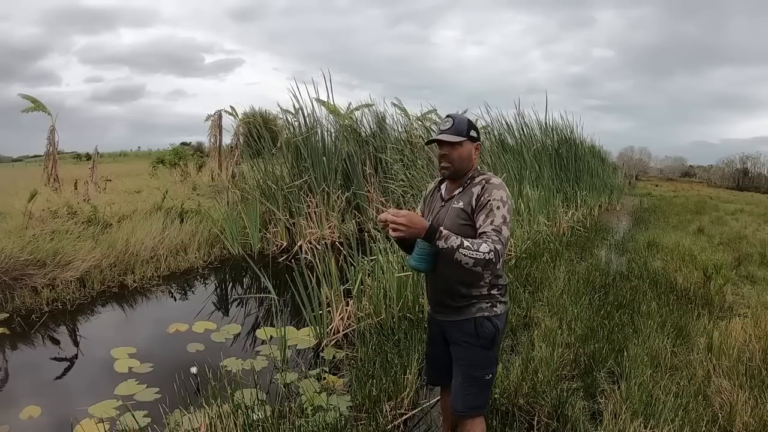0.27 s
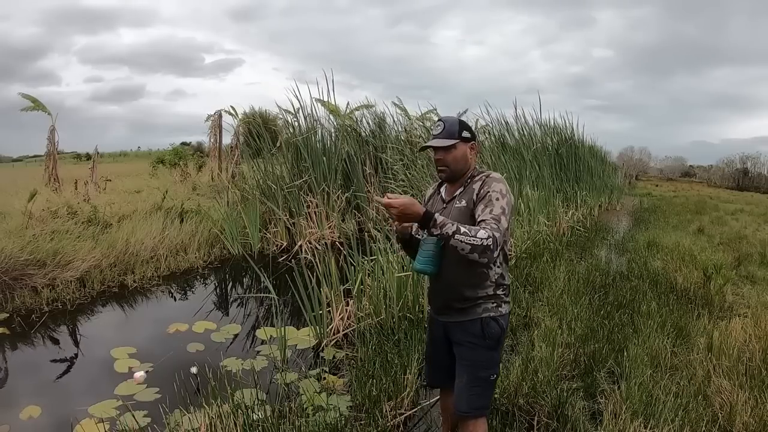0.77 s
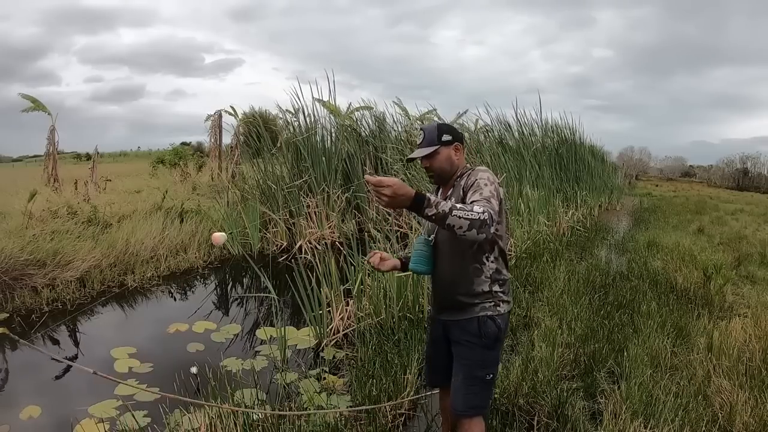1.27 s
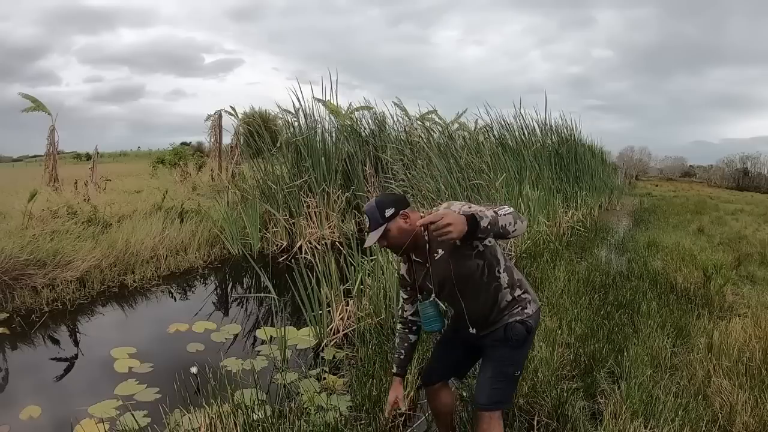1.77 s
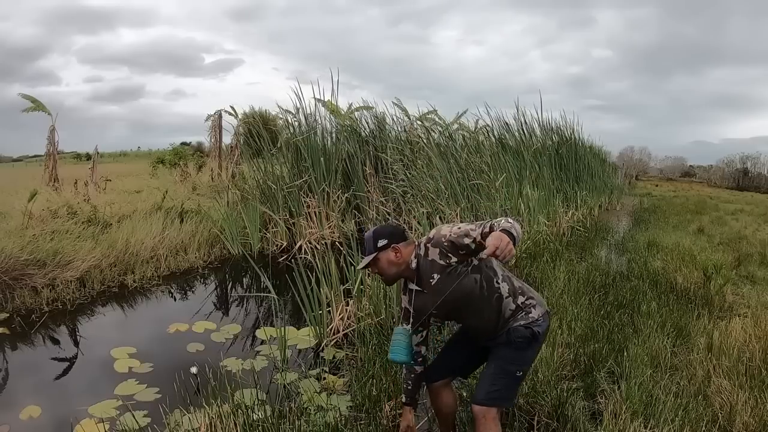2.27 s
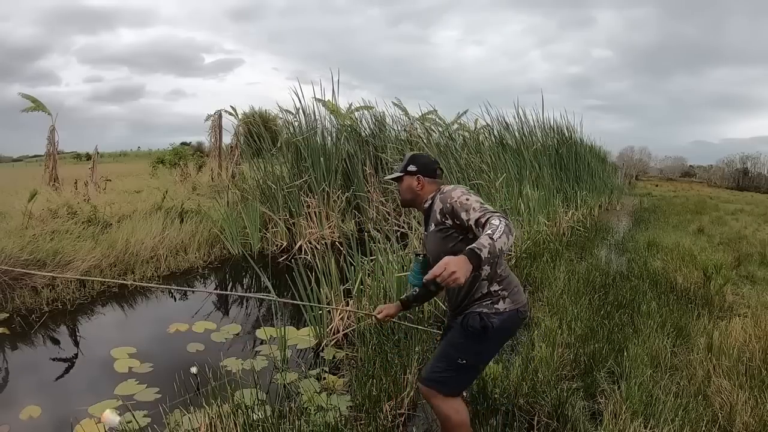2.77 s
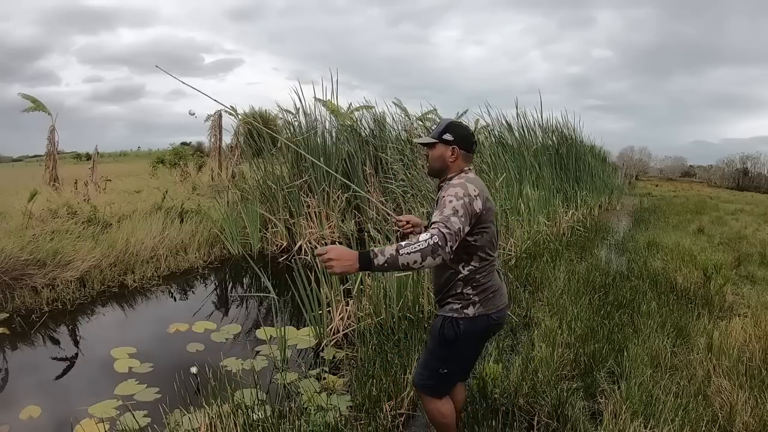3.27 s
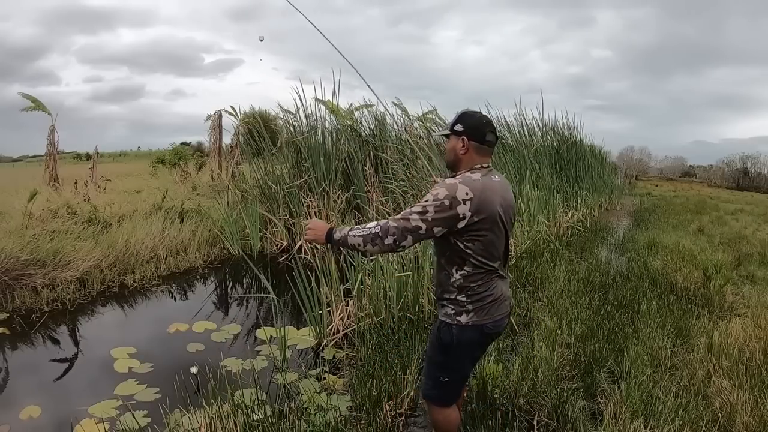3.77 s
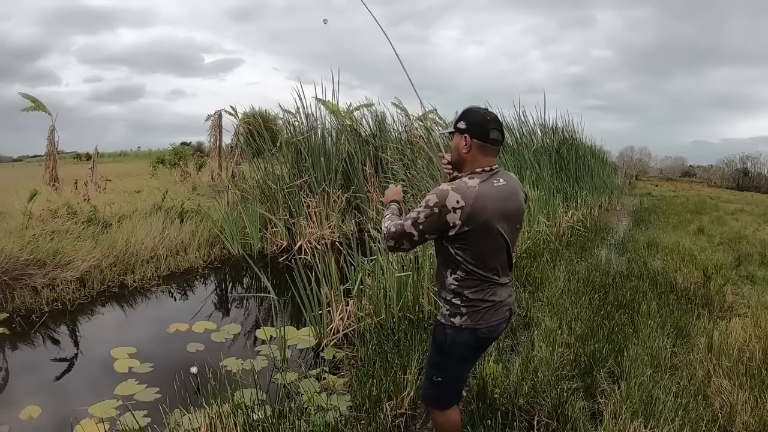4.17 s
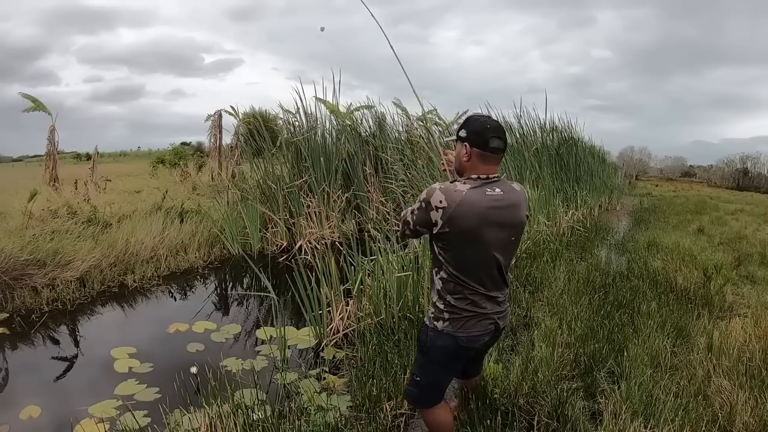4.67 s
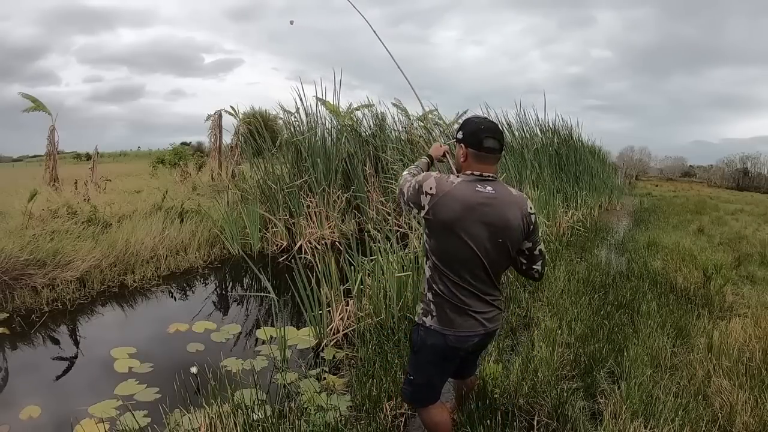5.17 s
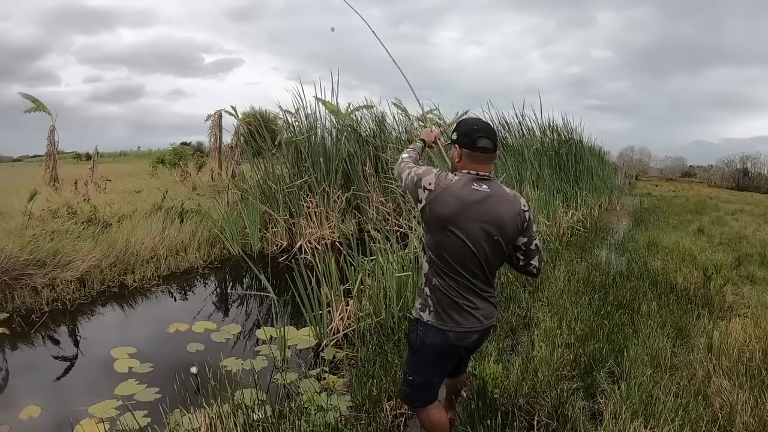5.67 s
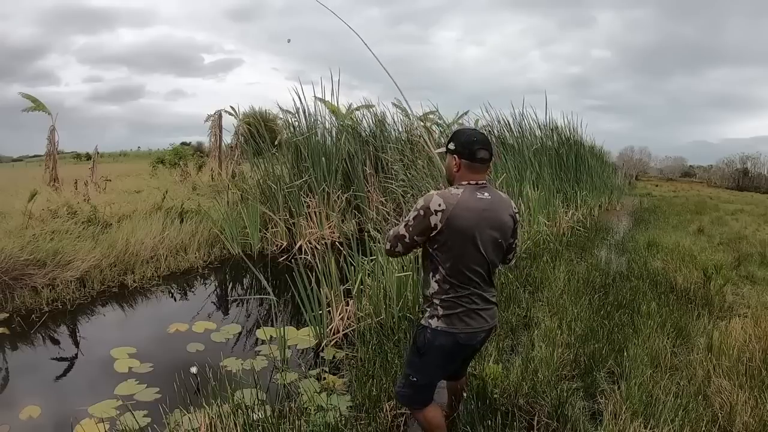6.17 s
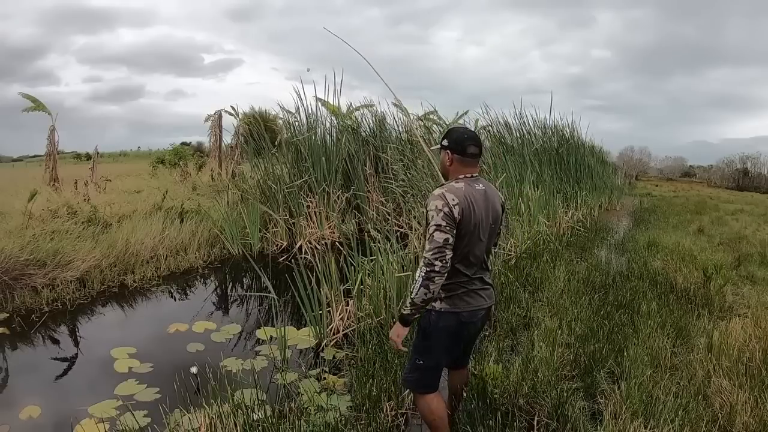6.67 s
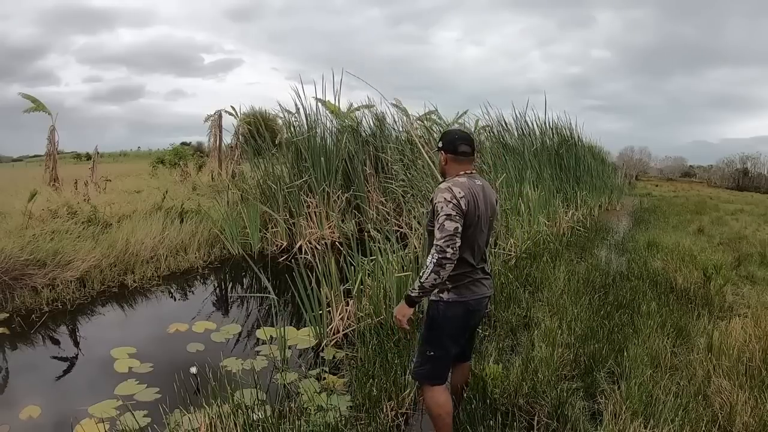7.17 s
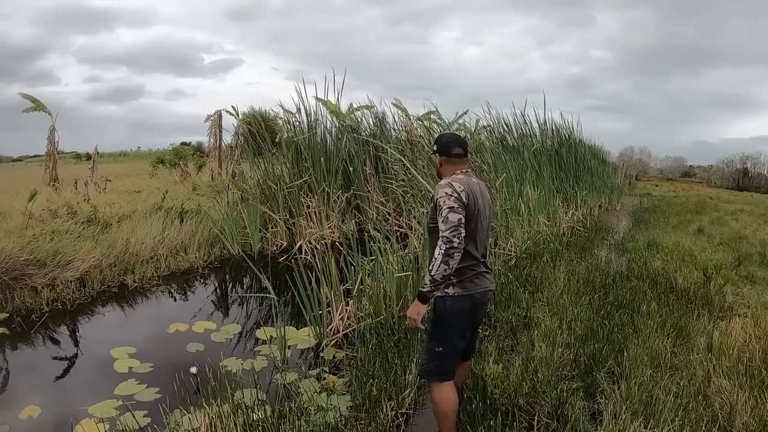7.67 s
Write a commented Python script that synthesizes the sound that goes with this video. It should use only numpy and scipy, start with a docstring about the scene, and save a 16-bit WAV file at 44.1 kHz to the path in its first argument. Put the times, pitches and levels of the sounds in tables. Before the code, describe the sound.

Gusts of wind rumble on the microphone throughout, in an open marsh. A nearby bird repeats quick, falling chips while someone shuffles through wet grass, with rustling, small splashes, drips and a few snapping stalks. As the steps settle, the chipping returns over faint mewing calls, and a bird gives several louder squeals near the end. Thin pips and a high trill come from far off.

```python
"""Angler by a windy, reedy ditch

Wind buffets the two microphone openings (ports) of a small camera. An angler shuffles through wet
grass and shallow water: blades rustle, stalks snap, drops slap and trap ringing bubbles, a rod swishes.
Marsh birds chip, mew and squeal nearby, others pip, trill and rasp far off; the reeds scatter echoes."""
import sys
import numpy as np
from scipy import signal
from scipy.fft import rfft, irfft, next_fast_len
from scipy.io import wavfile
from scipy.ndimage import uniform_filter1d

SR = 44100
rng = np.random.default_rng(int(sys.argv[2]) if len(sys.argv) > 2 else 0)


def wav_record(signal):
    """Record a signal, one row per channel, as 16-bit PCM in the file named by sys.argv[1]."""
    frames = np.transpose(np.atleast_2d(signal))
    bounded = np.clip(frames, -1, 1)
    # unit amplitude maps onto the largest positive 16-bit level
    quanta = np.round(bounded * 32767).astype(np.int16)
    wavfile.write(sys.argv[1], SR, quanta)


N = 349713

# How far the left port's wave runs ahead of the right one's: frequency_hz, lead_radians
PORT_PHASE = [(0, -9), (430, 5), (860, 9), (1120, 7.5), (2410, 7.5), (3360, 7), (4570, -1.5), (4910, 7.5),
              (5170, 6.5), (6030, 5), (6720, 8.5), (6980, 8), (7410, 4.5)]
MARSH_PHASE = [(0, -10), (340, 3.0), (690, 2.5), (1380, 3.5), (1640, 3.5), (1890, 1.5), (2500, 2),
               (2760, -1), (3960, -1.1), (4650, 0.5), (6030, 2), (6370, 3), (6720, 2.5), (7410, 5)]
# How alike a hiss is at the two ports: frequency_hz, likeness (1 = the same)
PORT_LIKENESS = [(200, 0.71), (1000, 0.83), (3000, 0.59), (6000, 0.45), (10000, 0.8)]
# Gusts: peak_s, level_db, hold_s, fade_db_per_s, left_minus_right_db, flutter_vs_rumble_db
GUSTS = [(0, -43, 0.17, 57, -3.5, -14), (0.089, -33, 0.011, 206, -22, -16),
         (0.608, -46, 0.02, 33, -0.5, -20), (1.129, -46.5, 0.18, 58, -0.5, -14.5),
         (1.234, -43.5, 0.011, 191, -26, -38), (1.509, -32.5, 0.13, 54.5, -4, -7.5),
         (1.736, -28, 0.0069, 262, -12.5, -6.5), (1.791, -34.5, 0.23, 349, -6.5, -11),
         (2.237, -37, 0.26, 47, -5, -23), (2.534, -41, 0.0074, 121, 0, -5),
         (2.919, -47.5, 0.0072, 400, 15, -11), (3.035, -43, 0.0094, 197, 0, -28),
         (3.11, -53.5, .03, 74, -7, -25), (3.465, -56, 0.012, 156, -3, -11),
         (3.631, -56, 0.0091, 30, -0.5, -36), (4.041, -39.5, 0.007, 253, -4, -17),
         (4.199, -45.5, 0.0085, 42, -1.5, -22), (4.513, -40, 0.051, 198, -11, -25),
         (4.661, -37.5, 0.018, 199, -3.5, -14.5), (4.754, -43, 0.075, 56.5, -2, -17.5),
         (4.876, -29.5, 0.0099, 242, 0, -18), (5.02, -33, .01, 32.5, -7, -15.5),
         (5.388, -30.5, 0.071, 73.5, -6.5, -12.5), (5.658, -33, 0.022, 198, -3, -3),
         (5.727, -38, 0.014, 200, 2, 0), (5.85, -32.5, 0.012, 393, -12.5, -30),
         (5.949, -40.5, 0.072, 52.5, -6.5, -12.5), (6.23, -29.5, 0.07, 105, -4.5, -14),
         (6.607, -37.5, 0.0066, 242, -4, -15), (6.731, -40.5, 0.12, 93.5, -11.5, -19),
         (6.931, -33.5, 0.016, 224, -2.5, -15), (6.994, -35.5, 0.035, 265, -5.5, -12),
         (7.163, -39.5, 0.12, 151, -3.5, -18.5), (7.324, -40, 0.072, 150, -8.5, -15),
         (7.436, -40.5, 0.076, 150, -4.5, -12.5), (7.584, -41, 0.053, 260, -3.5, -17),
         (7.088, -29, 0.0072, 298, -10.5, -25), (7.72, -48, 0.035, 21, -2, -10.5),
         (7.828, -45, 0.12, 41, -3.5, -11)]
# The tone colour of each kind of noise: frequency_hz, level_db
RUMBLE_COLOUR = [(7.1, -32.5), (12, -6.5), (32, 7), (47, 1), (66, -5.5), (130, -29.5), (170, -48),
                 (290, -120)]
FLUTTER_COLOUR = [(41, -23.5), (70, 1.5), (127, -11), (167, -24), (196, -26), (248, -50.5), (500, -54.5),
                  (650, -101), (1100, -120)]
MARSH_COLOUR = [(59, -30), (100, 2), (192, -11.5), (272, -18), (661, -29.5), (934, -30.5), (1020, -27.5),
                (1500, -27), (2360, -35), (3150, -33.5), (4790, -41.5), (6400, -31.5), (7680, -44),
                (9980, -56.5), (12500, -57), (15500, -63.5)]
RUSTLE_COLOUR = [(180, -45), (300, -14), (659, -12.5), (735, -14), (808, -6.5), (1210, -6), (1490, -2.5),
                 (2890, -2), (3500, -4), (3790, -2), (4600, -9.5), (6710, -8), (7680, -18), (9980, -21),
                 (12500, -31), (15500, -36.5)]
SLAP_COLOUR = [(300, -58.5), (900, -1), (1600, 5.5), (3200, 6.5), (4500, -25.5), (9000, -45)]
TICK_COLOUR = [(1500, -41), (3500, 5), (5500, 1), (7000, 1), (8500, -22), (10000, -13), (12000, -23),
               (14200, -28), (15500, -57)]
# Grass being brushed all along: time_s, level_db, brightness_db_per_octave
BRUSHING = [(0, -74.5, -2), (.4, -82, 6), (1.1, -68.5, 1.5), (1.45, -74.5, 0), (1.75, -68.5, -0.5),
            (2.05, -68, 1), (2.35, -71.5, 0.5), (2.7, -68, -2.5), (3.05, -74, 0.5), (3.4, -71, 0),
            (3.83, -70.5, 0.5), (4.0, -72.5, 2), (4.4, -71.5, 4), (4.75, -78, 5.5), (5.5, -75, -3),
            (7.0, -79.5, 2.5), (7.701, -84, 1.5), (7.93, -66, -6.5)]
# Strides through grass and water: peak_s, level_db, hold_s, fade_db_per_s, brightness_db_per_octave
STRIDES = [(1.19, -70, 0.034, 65, 5), (1.694, -61, 0.008, 300, -1.5), (1.83, -66.5, .025, 250, -3.5),
           (2.4, -63.5, 0.021, 48.5, 2), (2.764, -59, 0.16, 67, 0.5), (3.117, -58.5, 0.14, 303, -3),
           (3.145, -51, 0.012, 300, 1.5), (4.086, -63.5, 0.14, 47.5, -2.5), (6.503, -74.5, 0.047, 26, -1.5),
           (7.777, -68.5, 0.21, 50, 1.5)]
# Far pips: start_s, level_db
PIPS = [(.04, -76), (.27, -77), (.5, -80), (.72, -83), (.95, -80), (1.185, -81), (1.41, -76),
        (1.888, -70.5), (2.122, -70.5), (2.35, -78)]
# How loud the far trill is: time_s, level_db
TRILL_LEVELS = [(0, -77.5), (3, -86.5), (6.001, -83.5), (7.2, -73), (7.9, -86)]
# Snapping stalks: start_s, level_db, then added to that level: tick_db, low_ring_db, high_ring_db
SNAPS = [(0.774, -60.5, -13, -20, -9), (1.197, -61.5, -4, -13, -20), (1.677, -62, -9, -21, -14),
         (1.686, -54.5, -10, -14, -24), (2.6459, -56, -1, -18, -11), (2.689, -49.5, -16, -24, -30),
         (3.281, -58, -7, -14, -8), (3.293, -63, -1, -14, -12), (3.6742, -60, -7.5, -16, -24),
         (3.8103, -44.5, -16.5, -21, -18), (3.821, -51, -8.5, -5, -10), (4.3062, -38.5, -29, -30, -38),
         (4.483, -60, -16, -22, -28), (4.6032, -57, -30, -28, -30), (7.883, -41.5, -20, -12, -13.5)]
# The two tones a stalk rings with: pitch_hz, ring_s (time to fade by 60 dB)
STALK_TONES = [(6600, 0.0063), (9600, 0.0082)]
# Thin far whistles, plus the steady ringing echo of the first squeal (at 6.658 s), plus faint high # lines near
# 7 kHz riding over the mews (at 6.684, 7.066 and 7.258 s): # start_s, length_s, from_hz, to_hz, level_db
WHISTLES_AND_ECHO = [(0.96, .06, 5800, 3700, -92), (3.54, 0.057, 4400, 3380, -75),
                     (3.541, 0.055, 4000, 2950, -79), (4.633, 0.057, 4530, 3270, -80.5),
                     (4.782, 0.038, 4890, 3570, -80), (5.042, 0.069, 4440, 3240, -79.5),
                     (5.31, 0.1, 2500, 2500, -83), (5.543, 0.035, 3480, 3250, -79.5),
                     (5.841, 0.16, 2645, 2596, -76.5), (6.658, 0.054, 3980, 3990, -65.5),
                     (6.684, 0.19, 7180, 6800, -83), (5.05, 0.047, 4920, 3700, -87),
                     (5.128, 0.018, 2050, 2020, -77), (7.066, .165, 7630, 7330, -85),
                     (7.258, 0.09, 7350, 7600, -90), (7.813, 0.027, 2700, 2820, -70),
                     (7.853, 0.03, 2920, 2750, -64), (6.049, 0.015, 1410, 1380, -73),
                     (6.227, 0.023, 2050, 2040, -77), (6.327, 0.024, 1960, 2100, -72)]
# The shape of one chip: time_s, pitch_hz, level_db
CHIP_SHAPE = [(0, 4170, 4), (.005, 3590, 2), (0.012, 2915, 2.5), (.021, 2660, -2.5), (0.032, 2508, -3.5),
              (.038, 2280, -4), (0.042, 1880, -22.5)]
# The near bird's chips: start_s, level_db, skipped_opening_s, opening_boost_db
CHIPS = [(1.038, -60, .012, -2), (1.349, -56.5, .001, 5), (1.631, -56, .001, 12), (1.911, -56, .001, -2),
         (2.176, -57.5, .001, -9), (2.435, -58, .005, -8), (2.698, -59.5, .005, -5), (5.142, -64, .01, -2),
         (5.501, -58.5, .001, -10), (5.781, -57.5, .001, 3), (6.059, -56.5, .001, -7),
         (6.331, -59.5, .001, -10), (6.615, -58, .004, -5), (6.887, -57.5, .002, -9),
         (7.168, -56.5, 0.003, -8)]
# The rod tip sweeping through the air: time_s, pitch_hz, level_db
ROD_SWISH = [(1.7, 6350, -89), (1.782, 7080, -76), (1.92, 6470, -87), (2.052, 5540, -81), (2.17, 4700, -82)]
# Drops, plus two soft low thuds (at 6.598 and 7.563 s): start_s, tone_db, pitch_hz, slap_vs_tone_db,
# tick_vs_tone_db, glide (share of pitch gained while ringing), ring (1 = the usual time for its pitch)
DROPS_AND_THUDS = [(1.844, -60, 1950, -2, -27, 0.15, 0.77), (1.984, -63, 570, 3.5, -21, .3, .5),
                   (2.586, -55, 1700, 2, -28, .3, 0.67), (2.592, -45.5, 1340, -23, -30, 0.37, 0.45),
                   (2.59, -57.5, 746, -30, -40, .4, 0.58), (2.6, -50.5, 3500, -6, -13.5, 0.59, 0.73),
                   (2.616, -54, 1310, -5, -30, .3, .6), (2.629, -52, 1940, -15, -30, .05, 1.2),
                   (2.662, -49, 2010, -12, -26, .1, 0.97), (2.746, -44.5, 3470, -11, -20, .3, 0.95),
                   (2.766, -56, 2660, 7, -10, .3, 0.54), (2.77, -43, 1900, -1, -26, 0.12, 0.56),
                   (2.779, -58, 1470, 4, -27, 0.38, .6), (2.79, -65, 1290, 0, -23, .3, .6),
                   (2.912, -60.5, 2220, 2, -7, .3, .6), (2.948, -56, 1280, -1, -19, .3, 0.75),
                   (2.975, -59, 1477, 2.5, -22, 0.23, .6), (3.093, -60, 2500, 8, -3, .3, .6),
                   (3.107, -49, 2970, -8, -15, .2, 0.66), (3.127, -50, 3280, 2, -8, .3, .6),
                   (3.146, -45, 3280, 1.5, -4.5, 0.35, 0.92), (3.154, -47, 3500, 1, -4.5, .3, .6),
                   (3.163, -42.5, 1180, -13, -28, .3, .5), (3.178, -49, 4240, -20, -20, 0.29, .7),
                   (3.179, -46, 1690, -19, -23, 0.22, .5), (3.222, -40.5, 1600, -13, -32, 0.012, 0.56),
                   (3.231, -38, 1227, -19, -30, 0.51, .6), (3.244, -44, 2000, -11, -35, .2, .5),
                   (3.277, -41, 1840, -19, -38, 0.14, 0.48), (3.297, -59, 515, 0, -14, -0.032, 0.57),
                   (3.455, -39, 1546, -5.5, -37, 0.041, 0.8), (3.485, -48.5, 2080, -19, -33, .2, .8),
                   (4.023, -50, 1810, -24, -17, 0.37, .7), (4.032, -51, 1060, -14, -24, 0.58, 1.9),
                   (4.072, -60, 840, -20, -30, .05, 1.1), (4.077, -50, 3720, -8, -25, 0.12, .8),
                   (4.087, -45.5, 1700, -6, -21, .1, 0.66), (4.098, -46, 699, -9, -35, -0.31, 1),
                   (4.1045, -48, 2030, -0.5, -24, -0.016, .8), (4.106, -50, 974, -20, -32, 0.78, 1.2),
                   (4.126, -51, 2140, -11, -34, .3, .8), (4.159, -50, 3230, -5, -11, 0.2, 0.94),
                   (4.161, -58, 730, -20, -30, -0.06, .6), (4.177, -47, 674, -14, -20, 0.97, 0.84),
                   (4.176, -47, 2250, -7, -17, -0.005, 1.1), (4.184, -48, 1420, -8, -13, .05, .8),
                   (4.193, -44, 1080, -7, -28, 0.83, .9), (4.205, -50, 2670, -10, -22, .1, .9),
                   (4.223, -48, 1780, -17, -30, .1, 1), (4.226, -51, 530, -30, -35, 1, 0.44),
                   (4.239, -52.5, 507, -2, -30, 0.7, 0.59), (4.251, -49.5, 1410, -14, -10.5, .05, 0.85),
                   (4.262, -49, 872, -6, -15, -0.089, 1.3), (4.281, -55, 1110, -12, -30, 0.13, 0.76),
                   (4.304, -48.5, 2560, -13, -32, .03, 1), (4.338, -55.5, 1440, -15, -30, 0.28, .7),
                   (4.361, -53.5, 3040, -8, -28, .1, 1.3), (4.503, -59, 1760, -4, -17, 0.35, .9),
                   (6.598, -67.5, 360, -25, -40, .05, 0.33), (7.563, -63, 330, -25, -37, -0.021, .35),
                   (7.886, -59.5, 705, -36, -38, .05, .6)]
# Showers of small drops: from_s, to_s, level_db
SPRAYS = [(3.1, 3.3, -49), (4.063, 4.3, -55.5), (4.317, 4.525, -64.5)]
# Mews: start_s, length_s, top_hz, end_hz, top_at (share of the length), climb and jump (shares of
# the top pitch), level_db, then added to that level: second_harmonic_db, third_harmonic_db
MEWS = [(3.75, 0.19, 1510, 1450, 0.062, .06, .001, -71.5, -22, -26),
        (4.33, 0.29, 1627, 1515, 0.1, 0.063, 0.0012, -75.5, -19, -5.5),
        (4.8, 0.3, 1660, 1580, 0.49, .02, 0.011, -76, -1.5, -4.5),
        (5.29, 0.3, 1730, 1717, 0.39, 0.11, 0.016, -75.5, -2, -3),
        (5.74, 0.34, 1732, 1625, 0.17, 0.016, 0.069, -72.5, -1, -7),
        (6.26, 0.37, 1710, 1630, 0.42, 0.063, 0.0051, -72, -2.5, -10),
        (6.78, .43, 1787, 1286, 0.27, .06, .045, -71, -1, -3),
        (7.22, 0.32, 1809, 1790, 0.7, .11, 0.0021, -70.5, -1, -4),
        (7.69, 0.27, 1795, 1790, 0.82, .084, .002, -71.5, -2, -8)]
# A short, hoarse call far off: time_s, pitch_hz, level_db
RASP = [(6.475, 5400, -78), (6.51, 5500, -74), (6.57, 5230, -80)]
# Squeals: start_s, rise_s, hold_s, fall_s, from_hz, top_hz, to_hz,
# rise_bend and fall_bend (1 = straight), level_db, change_db_per_s
SQUEALS = [(6.641, 0.015, 0.0074, .098, 1583, 2002, 1083, 2.22, 1.2, -51.5, -49),
           (6.826, 0.088, .085, .165, 1271, 1783, 1545, 2.2, 1.7, -54, -46),
           (7.03, 0.024, .006, .016, 1750, 1790, 1770, 2.1, 2.2, -62, -3),
           (7.727, 0.038, .001, .001, 1420, 1790, 1850, 1.04, 1.1, -62, 7),
           (7.749, 0.04, 0.0011, 0.0011, 1330, 2000, 2010, 1.2, 1.1, -53.5, -8),
           (7.778, 0.0097, .001, .001, 1230, 1520, 1530, 1.1, 1.1, -49.5, -5),
           (7.782, 0.0403, 0.06, 0.0505, 1594, 1872, 1660, 2.65, 1.5, -49, -10),
           (7.822, 0.027, 0.0098, 0.0027, 1532, 2003, 1980, 1.59, 1.1, -53, -5)]
# What the squealing bird's throat lets through: frequency_hz, gain_db
THROAT = [(1100, -26.5), (1800, -18), (2050, -22.5), (2600, -13.5), (3450, -1), (3780, -4), (4000, -7.5),
          (4500, -30), (5500, -21), (6100, -19)]


def amp(db):
    """Turns decibels into a factor to multiply by."""
    return 10 ** (np.asarray(db) / 20)


def evened(x):
    """Scales a signal to an average power of one."""
    return x / np.sqrt(np.mean(x ** 2) + 1e-20)


def smooth(x, samples):
    """Takes a running average twice, leaving only slow changes."""
    return uniform_filter1d(uniform_filter1d(x, samples), samples)


def look_up(table, hz):
    """Reads between a table's rows on a logarithmic frequency scale."""
    table_hz, value = np.transpose(table)
    return np.interp(np.log(hz + 1), np.log(table_hz + 1), value)


def add(mix, start_s, sound):
    """Mixes a sound in at its start time."""
    part = mix[round(start_s * SR):][:len(sound)]
    part += sound[:len(part)]


def coloured(x, colour):
    """Gives a signal the tone colour in a table."""
    return irfft(rfft(x) * amp(look_up(colour, np.fft.rfftfreq(N, 1 / SR))), N)


def ports(left, right, pan_db, lag_s=0, phase=PORT_PHASE):
    """Sound reaches the two ports out of step; a positive pan_db makes the left louder."""
    padded = next_fast_len(N + SR // 10)  # spare samples keep the end from wrapping to the start
    hz = np.fft.rfftfreq(padded, 1 / SR)
    shift = np.exp(1j * (look_up(phase, hz) - 2 * np.pi * hz * lag_s))
    left = irfft(rfft(left, padded) * shift, padded)[:N]
    share = 2 / (1 + amp(-pan_db))
    return np.array([share * left, (2 - share) * right])


def reed_echoes(x, ring_s, delay_s):
    """The reeds scatter sound into many tiny echoes, different at each port."""
    t = np.arange(SR // 2) / SR
    echoes = rng.standard_normal((2, len(t))) * amp(-60 * t / ring_s) * (t > delay_s)
    return signal.fftconvolve(x[None], echoes / np.linalg.norm(echoes[0]), axes=1)[:, :N]


def swells(rows, rise_db_per_s):
    """The level in dB of each gust or stride as it rises, holds and fades."""
    t = np.arange(0, N / SR + .01, .002)
    peak_s, db, hold_s, fade = rows[:, :4].T[..., None]
    return t, db - rise_db_per_s * np.maximum(peak_s - t, 0) - fade * np.maximum(t - peak_s - hold_s, 0)


def hiss(level_at, likeness, patchy_db, flicker_db):
    """Two-port noise shaped by level_at(hz, t), with drifting patches and a quick flicker."""
    frames = N // 128 + 5
    a, b, c, d, patches = rng.standard_normal((frames, 257, 5)).T
    patches = evened(uniform_filter1d(uniform_filter1d(patches, 8, 0), 16, 1))
    flicker = np.minimum(rng.exponential(1, frames), 3.5)
    hz = np.fft.rfftfreq(512, 1 / SR)[:, None]
    shared = np.clip(likeness * look_up(PORT_LIKENESS, hz), 0, 1)
    left = a + 1j * b
    right = shared * left + np.sqrt(1 - shared ** 2) * (c + 1j * d)
    spectrum = np.array([left, right]) * level_at(hz, np.arange(frames) * 128 / SR)
    spectrum *= amp(patchy_db * patches + flicker_db * flicker)
    return signal.istft(spectrum, nperseg=512, noverlap=384)[1][:, :N]


def wind():
    """Swirls of air press on each port separately: a rumble and a flutter that swell with the gusts."""
    gusts = np.array(GUSTS)
    t, gust_db = swells(gusts, rise_db_per_s=419.5)
    pan_db, flutter_db = gusts[:, 4:].T
    sides = 4 / (1 + amp([-2 * pan_db, 2 * pan_db]))

    def layer(colour, extra_db, calm_db, power_floor):
        power = (sides * amp(2 * extra_db)) @ amp(2 * gust_db) + amp(2 * calm_db)
        strength = [np.interp(np.arange(N) / SR, t, np.sqrt(side)) for side in power]
        noise = coloured(rng.standard_normal((2, N)), colour)
        noise /= np.sqrt(smooth(evened(noise) ** 2, 1800) + power_floor)  # flatten chance swells
        return strength * evened(noise)

    rumble = layer(RUMBLE_COLOUR, extra_db=0, calm_db=-72.5, power_floor=0.027)
    flutter = layer(FLUTTER_COLOUR, extra_db=flutter_db, calm_db=-79.5, power_floor=0.12)
    buffets = evened(smooth(rng.standard_normal((2, 2, N)), 900))
    return amp(2.48 * buffets[0]) * rumble + amp(2.6 * buffets[1]) * flutter


def marsh():
    """Far reeds and air blend into a steady wash."""
    wash = hiss(lambda hz, t: amp(look_up(MARSH_COLOUR, hz)), 0.82, patchy_db=2.5, flicker_db=1.46)
    return amp(-64.5) * ports(*evened(wash), pan_db=-0.5, phase=MARSH_PHASE)


def grass_rustle():
    """Brushed blades and droplets make a grainy noise that swells with each stride."""
    strides = np.array(STRIDES)
    brush_s, brush_db, brush_tilt = np.transpose(BRUSHING)
    times, stride_db = swells(strides, rise_db_per_s=255.5)
    stride_power = amp(2 * stride_db)
    brush_power = amp(2 * np.interp(times, brush_s, brush_db))
    power = stride_power.sum(0) + brush_power
    # The loudest movement has the most say in how bright the rustle is.
    tilt = (strides[:, 4] @ stride_power + np.interp(times, brush_s, brush_tilt) * brush_power) / power

    def level_at(hz, t):
        octaves = np.log2(np.clip(hz, 500, 12000) / 3000)
        return amp(look_up(RUSTLE_COLOUR, hz) + np.interp(t, times, tilt) * octaves)

    grains = evened(hiss(level_at, likeness=1, patchy_db=2.4, flicker_db=2.2))
    return amp(-2) * ports(*grains, pan_db=-3.5) * np.interp(np.arange(N) / SR, times, np.sqrt(power))


def bird_tone(call, waver, drift_samples):
    """Sings a slightly unsteady tone from rows of time_s, pitch_hz and a level_db for each harmonic."""
    times, hz, *levels = np.transpose(call)
    t = np.arange(times[0], times[-1], 1 / SR)
    drift, throb = (evened(smooth(noise, drift_samples)) for noise in rng.standard_normal((2, len(t))))
    cycles = np.cumsum(np.interp(t, times, hz) * (1 + waver * drift)) / SR
    tone = sum(amp(np.interp(t, times, db)) * np.sin(2 * np.pi * k * cycles)
               for k, db in enumerate(levels, 1))
    fade = np.clip(np.minimum(t - times[0], times[-1] - t) / .006, 0, 1)
    return times[0], np.sqrt(2) * tone * fade * amp(2 * throb)


def bird(calls, waver, pan_db, lag_s, echo_db, ring_s, drift_samples=250):
    """Calls from one spot arrive directly and as echoes off the reed wall."""
    voice = np.zeros(N)
    for call in calls:
        add(voice, *bird_tone(call, waver, drift_samples))
    echo_gain = amp(echo_db + np.array([[pan_db / 4], [-pan_db / 4]]))
    return ports(voice, voice, pan_db, lag_s) + echo_gain * reed_echoes(voice, ring_s, delay_s=.016)


def pip(start_s, db, pitch_hz=1145, length_s=0.048):
    """A short far note in which only the second and third harmonics are heard."""
    return [(start_s, .97 * pitch_hz, -120, db - 8, db - 12),
            (start_s + .01, pitch_hz, -120, db, db - 10),
            (start_s + length_s, pitch_hz, -120, db - 2.5, db - 12)]


def trill(first_s=.097, every_s=.2486, note_s=.019):
    """A far bird repeats a group of four high, falling notes."""
    starts = (first_s + every_s * np.arange(32)[:, None] + note_s * np.arange(4)).ravel()
    levels = np.interp(starts, *np.transpose(TRILL_LEVELS))
    return [[(s, 6900, db), (s + .011, 5700, db)] for s, db in zip(starts, levels)]


def stalk_snaps(crack=3.8):
    """A stalk breaks with one sharp crack, then splinters and rings briefly."""
    rings, slaps, ticks = np.zeros((3, N))
    t = np.arange(4000) / SR
    for start_s, db, tick_db, *tones_db in SNAPS:
        slap, tick = np.where(t > 0, rng.standard_normal((2, len(t))), crack)
        add(slaps, start_s, amp(db - 7 - 60 * t / 0.0082) * slap)
        add(ticks, start_s, amp(db + tick_db - 5.5 - 60 * t / 0.009) * tick)
        for tone_db, (hz, ring_s) in zip(tones_db, STALK_TONES):
            add(rings, start_s, amp(db + tone_db - 60 * t / ring_s) * np.sin(2 * np.pi * hz * t))
    return np.array([rings, slaps, ticks])


def whistle_or_echo(start_s, length_s, from_hz, to_hz, db):
    """A thin note that makes most of any slide in its first half."""
    middle_hz = to_hz + 0.25 * (from_hz - to_hz)
    return [(start_s, from_hz, db), (start_s + length_s / 2, middle_hz, db),
            (start_s + length_s, to_hz, db)]


def chip(start_s, db, skip_s, boost_db, opening_s=0.0045):
    """A quick falling note whose opening may be cut short, softer or louder."""
    return [(start_s + max(t, skip_s), hz, db + shape_db - 0.5 + boost_db * max(1 - t / opening_s, 0))
            for t, hz, shape_db in CHIP_SHAPE if t >= skip_s - .006]


def swish_or_rasp(curve, smooth_samples, pan_db):
    """A sliding band of noise: air swirling off the thin rod, or a hoarse call."""
    times, hz, db = np.transpose(curve)
    t = np.arange(times[0], times[-1], 1 / SR)
    a, b = uniform_filter1d(rng.standard_normal((2, len(t))), smooth_samples)
    angle = 2 * np.pi * np.cumsum(np.interp(t, times, hz)) / SR
    band = evened(a * np.cos(angle) - b * np.sin(angle))
    sound = np.zeros(N)
    add(sound, times[0], amp(np.interp(t, times, db)) * band)
    return ports(sound, sound, pan_db)


def drops_and_thuds(rows):
    """Drops slap, tick and trap bubbles, most rising in pitch near the air; a thud is a low tone."""
    tones, slaps, ticks = np.zeros((3, N))
    t = np.arange(4000) / SR
    for start_s, db, hz, slap_db, tick_db, glide, ring in rows:
        ring_s = .06 * (1000 / hz) ** .8 * ring  # higher tones (smaller bubbles) die sooner
        cycles = hz * (t + glide * t ** 2 / (2 * ring_s))
        tone = np.sin(2 * np.pi * cycles) * np.minimum(t / 0.00068, 1)
        slap, tick = rng.standard_normal((2, len(t))) * np.minimum(t / 0.00071, 1)
        add(tones, start_s, amp(db - 60 * t / ring_s) * tone)
        add(slaps, start_s, amp(db + slap_db - 60 * t / 0.019) * slap)
        add(ticks, start_s, amp(db + tick_db - 60 * t / .015) * tick)
    return np.array([tones, slaps, ticks])


def spray(drops_per_s=30, low_hz=1185, high_hz=3680, spread_db=2):
    """Rows for small drops of random timing, strength and pitch."""
    slap_db, tick_db, glide, ring = -3, -24, 0.44, 0.79
    drops = []
    for from_s, to_s, level_db in SPRAYS:
        for when, strength, pitch in rng.random((20, 3))[:round(drops_per_s * (to_s - from_s))]:
            start_s = from_s + (to_s - from_s) * when
            db = level_db + spread_db * (2 * strength - 1)
            hz = low_hz * (high_hz / low_hz) ** pitch
            drops.append((start_s, db, hz, slap_db, tick_db, glide, ring))
    return drops


def mew(start_s, length_s, top_hz, end_hz, top_at, climb, jump, db, second_db, third_db):
    """A long note that climbs to its top pitch, droops and brightens as it goes."""
    t = np.linspace(0, length_s, 48)
    progress = t / length_s
    before = np.clip(1 - progress / top_at, 0, 1)
    after = np.clip((progress - top_at) / (1 - top_at), 0, 1)
    scoop = np.exp(-t / 0.01214) + np.exp((t - length_s) / 0.01214)  # both ends dip
    hz = top_hz * (1 - climb * before ** 1.9 - jump * (before > 0) - 0.0728 * scoop)
    hz -= (top_hz - end_hz) * after ** 3.1
    first = db - 5 * (before + after + scoop)
    upper = first - 5 * (1 - progress)  # the upper harmonics start out weaker
    second, third = upper + second_db, upper + third_db
    return np.transpose([start_s + t, hz, first, second, third, third - 11, third - 24.5])


def squeal(start_s, rise_s, hold_s, fall_s, from_hz, top_hz, to_hz, rise_bend, fall_bend, db, db_per_s):
    """The pitch sweeps up, holds and slides off; the throat favours harmonics near its resonance."""
    t = np.linspace(0, rise_s + hold_s + fall_s, 40)
    to_climb = np.clip(1 - t / rise_s, 0, 1)
    fallen = np.clip((t - rise_s - hold_s) / fall_s, 0, 1)
    hz = top_hz - (top_hz - from_hz) * to_climb ** rise_bend - (top_hz - to_hz) * fallen ** fall_bend
    level_db = db - 4 * to_climb + db_per_s * t
    first, second, third = (level_db + look_up(THROAT, k * hz) for k in (1, 2, 3))
    return np.transpose([start_s + t, hz, first, second, third - 7.5])


def among_reeds(rings, slaps, ticks):
    """Colours snaps, drops and thuds; nearby blades scatter their ticks, the reed wall echoes it all."""
    bright = amp(14.5) * coloured(ticks, TICK_COLOUR)
    direct = amp(-.5) * rings + amp(5.5) * coloured(slaps, SLAP_COLOUR) + bright
    scatter = amp(-.5) * reed_echoes(bright, ring_s=0.02, delay_s=0)
    echoes = amp(-10) * reed_echoes(direct, ring_s=0.069, delay_s=0.0066)
    return ports(direct, direct, pan_db=-10) + scatter + echoes


def scene():
    """Places the birds, then adds the wind, the marsh and the angler."""
    birds = bird([chip(*row) for row in CHIPS], waver=0.0082,
                 pan_db=-14, lag_s=0.00014, echo_db=-11.5, ring_s=0.22)
    for mews, waver in (MEWS[:5], .008), (MEWS[5:], .0065):  # the later mews are steadier
        birds += bird([mew(*row) for row in mews], waver, drift_samples=560,
                      pan_db=3, lag_s=1.02e-5, echo_db=-15, ring_s=0.32)
    birds += bird([squeal(*row) for row in SQUEALS], waver=0.0064, drift_samples=120,
                  pan_db=-1.5, lag_s=1.03e-5, echo_db=-7, ring_s=0.44)
    far = [whistle_or_echo(*row) for row in WHISTLES_AND_ECHO] + [pip(*row) for row in PIPS] + trill()
    birds += bird(far, waver=.004, pan_db=-3, lag_s=1.04e-5, echo_db=-4, ring_s=.3)
    background = wind() + marsh()
    angler = grass_rustle()
    hits = drops_and_thuds(DROPS_AND_THUDS + spray()) + stalk_snaps()
    angler += among_reeds(*hits)
    angler += swish_or_rasp(ROD_SWISH, smooth_samples=150, pan_db=-9)
    birds += swish_or_rasp(RASP, smooth_samples=73, pan_db=-3)
    return background + angler + birds


def record(dry):
    """Fades both ends briefly and cuts the highest treble."""
    fade = np.clip(np.minimum(np.arange(N), np.arange(N)[::-1]) / (.005 * SR), 0, 1)
    treble_cut = signal.firwin(511, cutoff=15200, window=("kaiser", 9), fs=SR)
    return signal.oaconvolve(dry * fade, treble_cut[None], "same")


dry = scene()
out = record(dry)
wav_record(out)
```